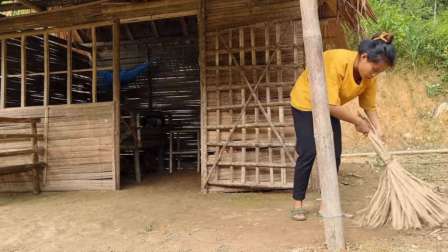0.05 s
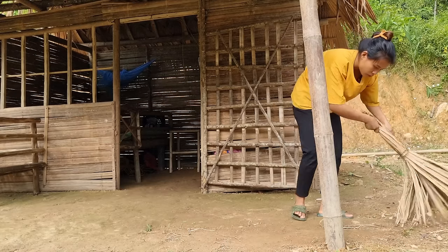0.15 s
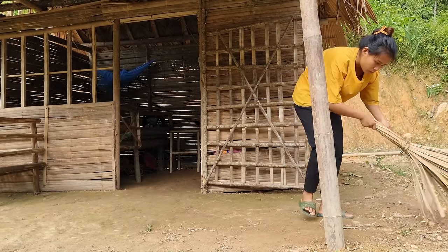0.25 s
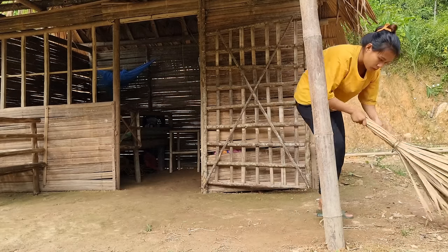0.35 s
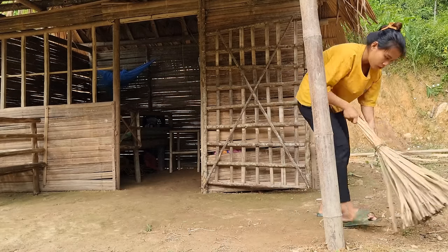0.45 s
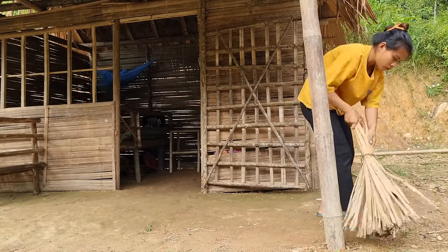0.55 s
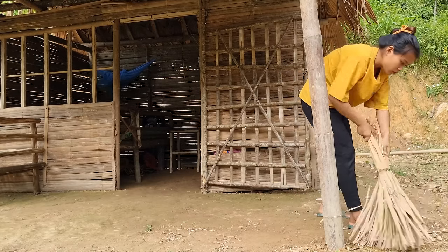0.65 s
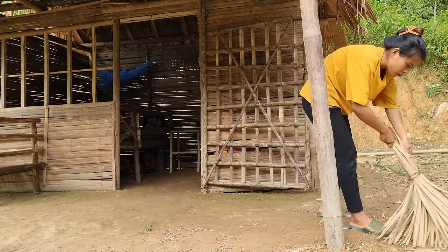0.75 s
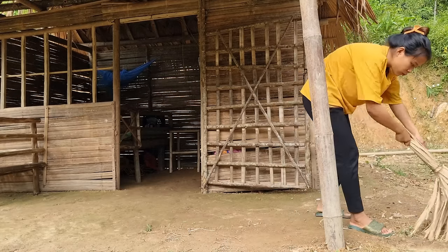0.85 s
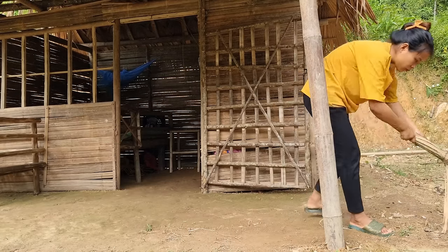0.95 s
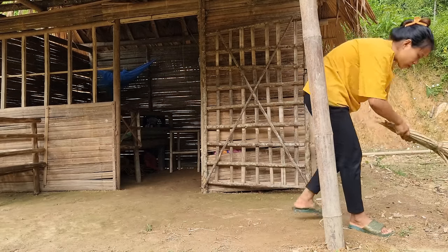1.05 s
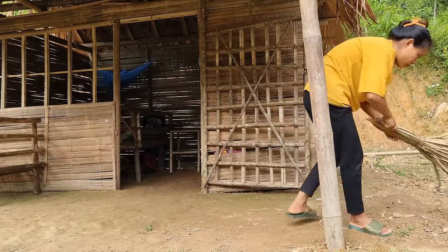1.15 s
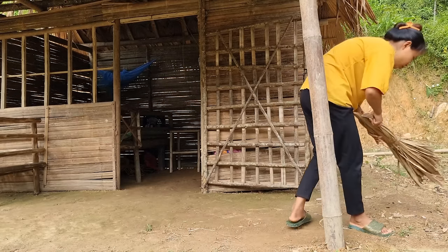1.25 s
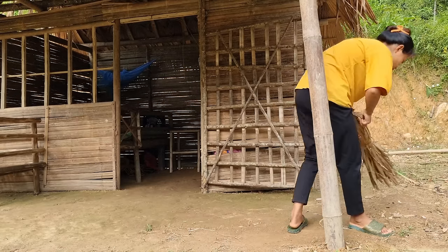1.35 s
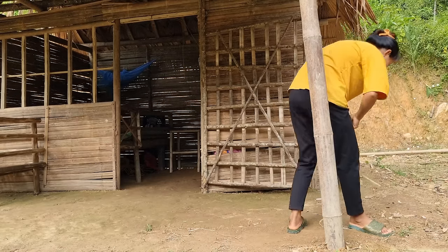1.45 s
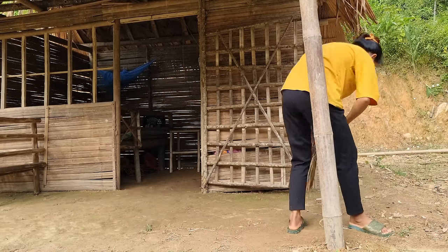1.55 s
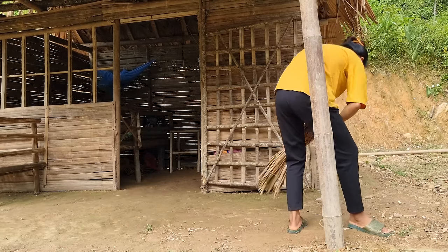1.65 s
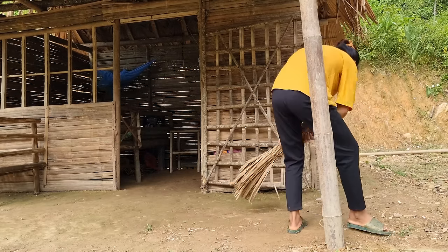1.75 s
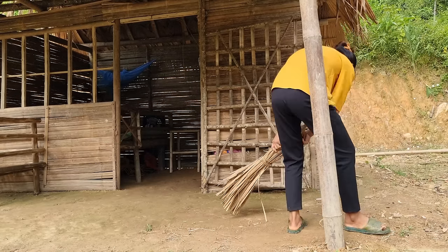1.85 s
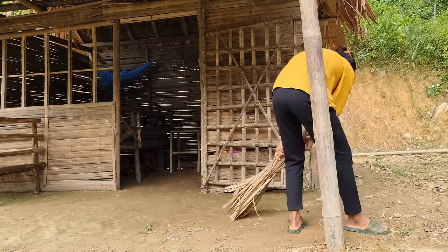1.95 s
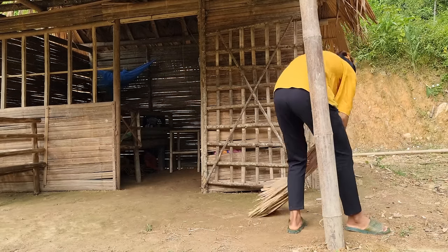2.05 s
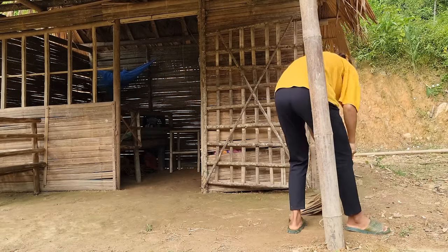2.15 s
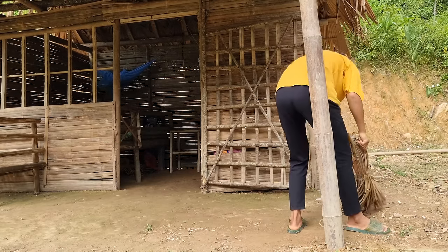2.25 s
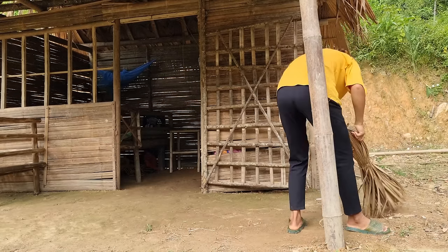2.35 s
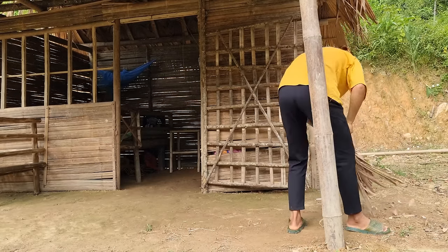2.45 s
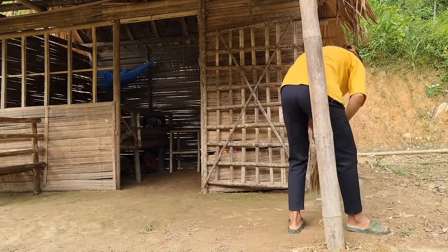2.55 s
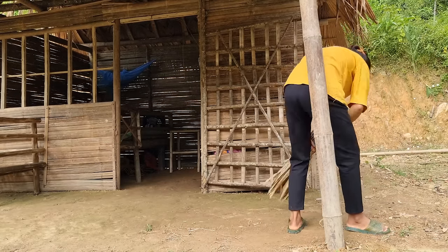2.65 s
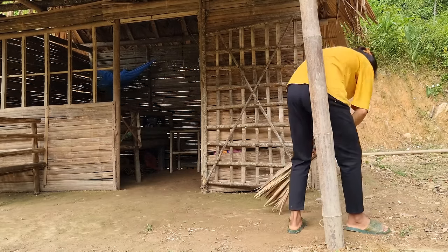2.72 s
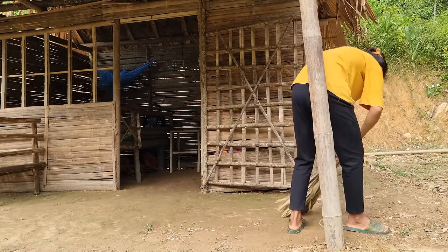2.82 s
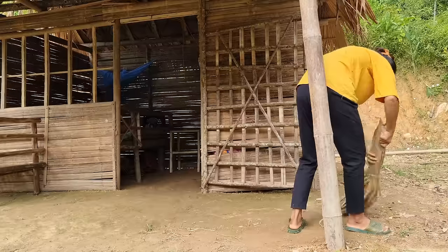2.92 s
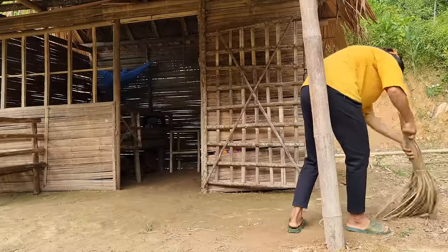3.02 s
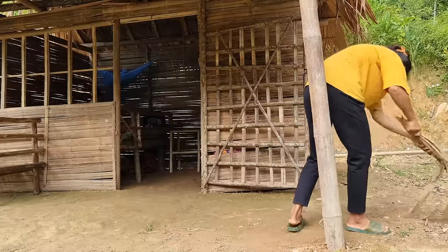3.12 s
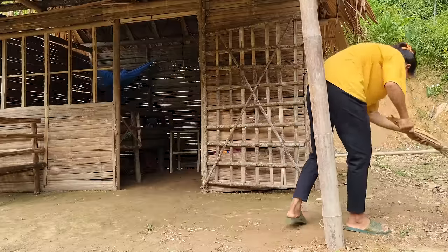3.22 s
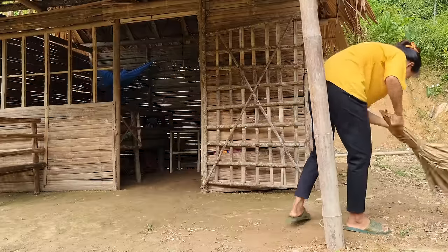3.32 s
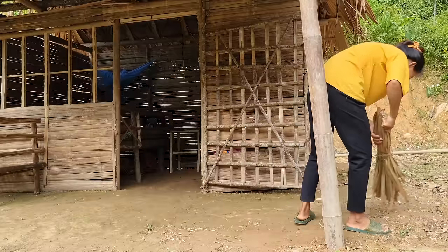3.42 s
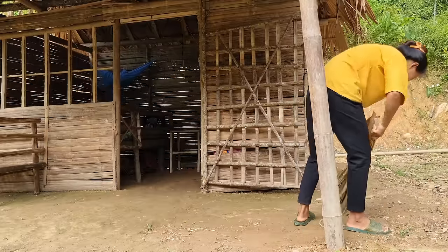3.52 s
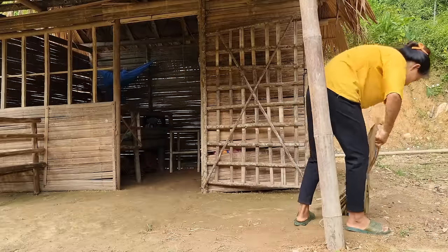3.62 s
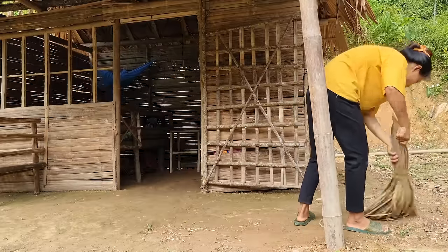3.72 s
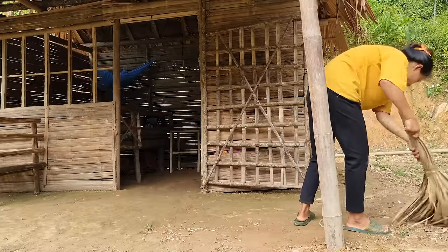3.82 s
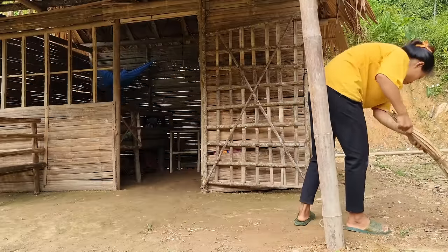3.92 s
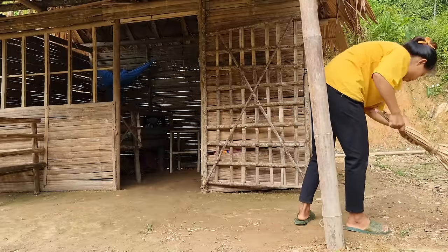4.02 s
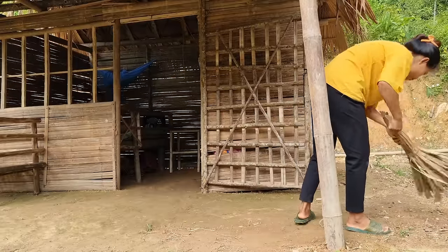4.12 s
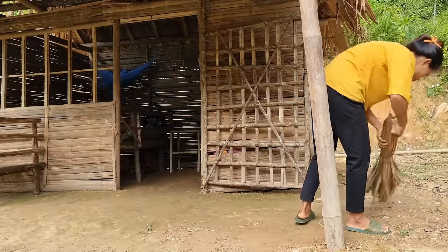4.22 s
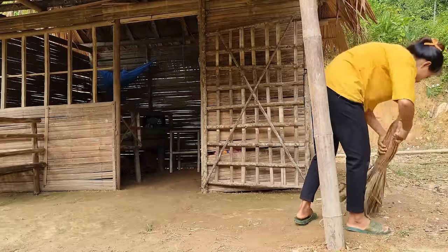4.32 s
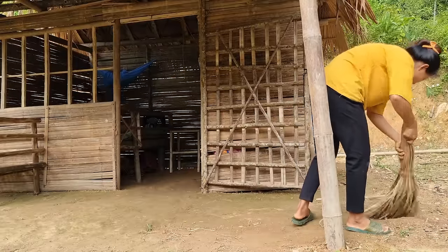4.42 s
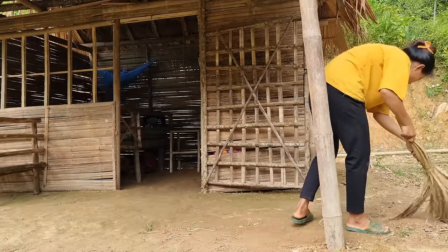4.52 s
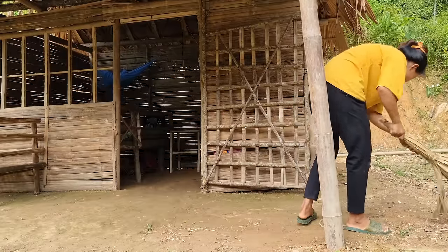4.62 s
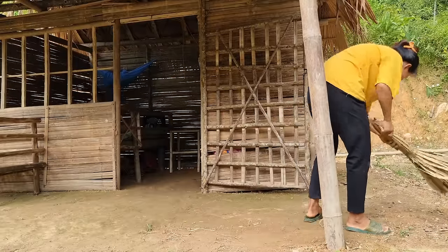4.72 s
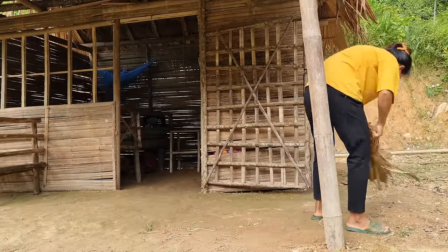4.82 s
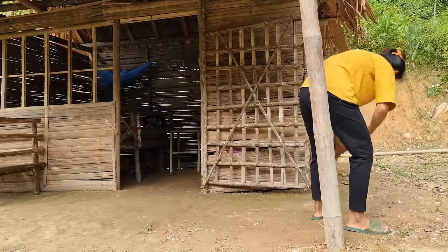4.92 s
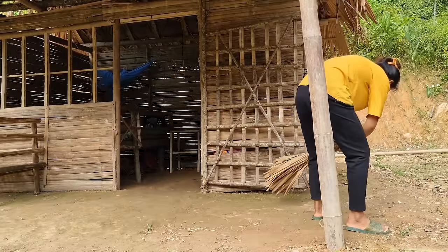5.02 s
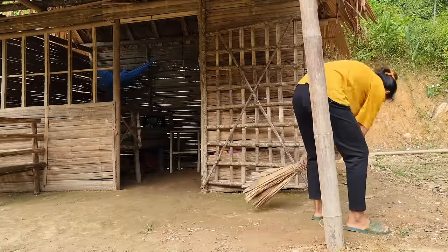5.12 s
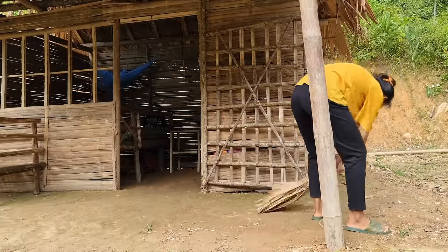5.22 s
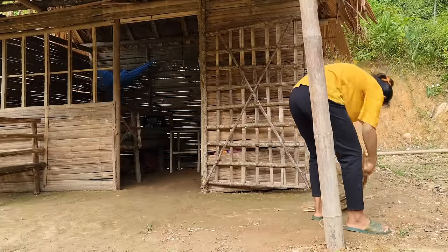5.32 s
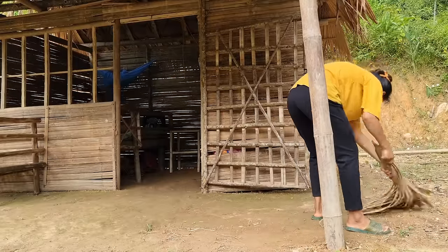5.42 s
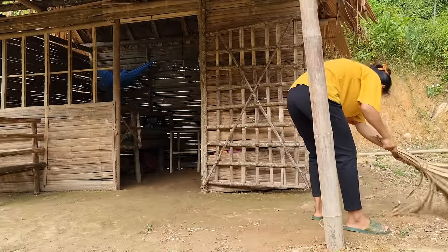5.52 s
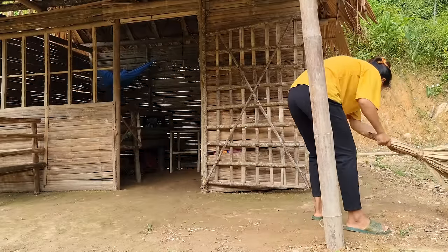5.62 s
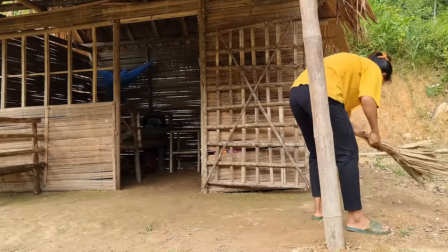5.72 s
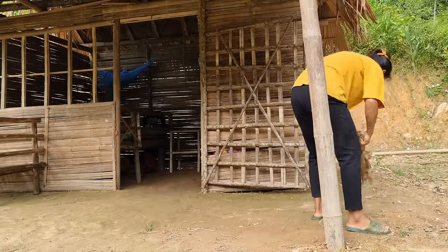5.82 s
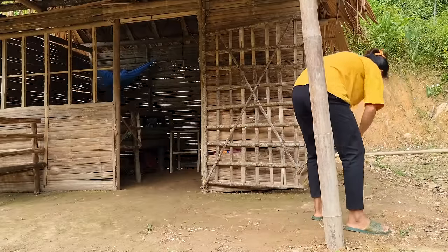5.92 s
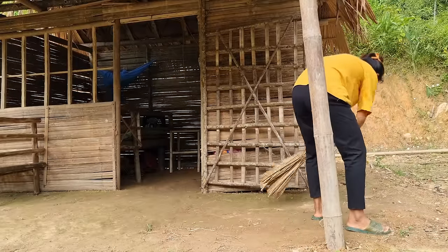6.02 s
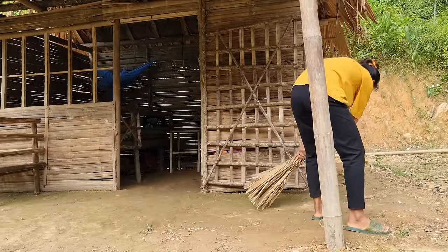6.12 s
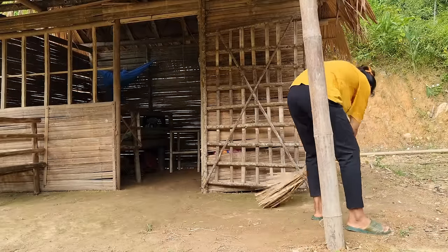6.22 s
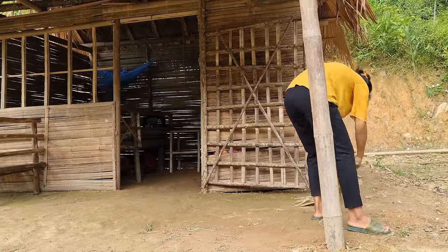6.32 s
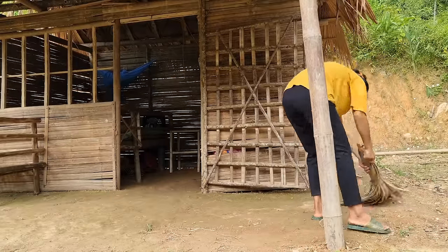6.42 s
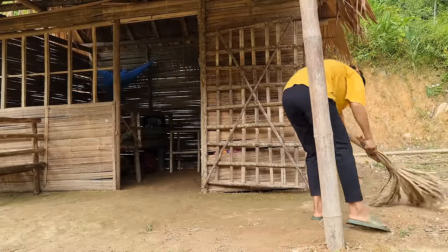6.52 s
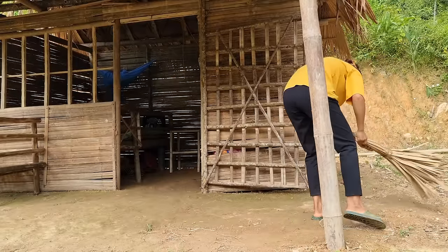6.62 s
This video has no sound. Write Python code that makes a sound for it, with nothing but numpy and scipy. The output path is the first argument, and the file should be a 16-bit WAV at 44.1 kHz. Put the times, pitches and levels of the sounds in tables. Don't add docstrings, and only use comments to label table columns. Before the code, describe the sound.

A stiff straw broom sweeps bare packed earth a few metres to the right of a phone. Eight gritty strokes come one by one, some firm and quick, others soft and slow, swinging from behind the legs outward and brightening. Stalks snap back, crumbs tick down and the bundle bumps softly. Behind it lie faint wind and thin distant insects, with a very short echo from a hut wall.

```python
import sys
import numpy as np
from scipy import signal
from scipy.fft import rfft, irfft
from scipy.io import wavfile
from scipy.ndimage import uniform_filter1d, map_coordinates

SR = 44100
rng = np.random.default_rng(int(sys.argv[2]) if len(sys.argv) > 2 else 0)


def put_to_file(sound):
    columns = np.atleast_2d(sound).T
    safe = np.clip(columns, -1, 1)
    whole_steps = np.round(safe * 32767)
    wavfile.write(sys.argv[1], SR, whole_steps.astype(np.int16))


def attenuation_scalar(level_db):
    decades = np.asarray(level_db, float) / 20
    return 10 ** decades


N = 293706


def unit(x):
    return x / np.sqrt(np.mean(x ** 2))


def band(x, lo_hz, hi_hz, order=2):
    sos = signal.butter(order, [lo_hz, min(hi_hz, .45 * SR)], "band", fs=SR, output="sos")
    return signal.sosfilt(sos, x)


def curve(table):
    start_s, *columns = np.transpose(table)
    return [np.interp(np.arange(N) / SR, start_s, column) for column in columns]


def colour(x, points, size=2048):
    freq_hz, level_db = np.transpose(points)
    grid_hz = np.arange(size // 2 + 1) * SR / size
    log_gain = np.log(attenuation_scalar(np.interp(np.log(grid_hz + 1), np.log(freq_hz), level_db)))
    cepstrum = irfft(log_gain, size)
    cepstrum[1:size // 2] *= 2
    cepstrum[size // 2 + 1:] = 0
    return signal.fftconvolve(x, irfft(np.exp(rfft(cepstrum)), size))[:N]


def late(x, lag_samples):
    return map_coordinates(x, [np.arange(N) - lag_samples], order=4, mode="nearest")


def walk(rate_hz):
    k = int(SR / rate_hz)
    held = np.repeat(rng.standard_normal(N // k + 1), k)
    return 1.3 * uniform_filter1d(uniform_filter1d(held, k), k)[:N]


def slips(rate_hz, spread_db, fade_s):
    when, size = rng.random(N), np.minimum(rng.exponential(1, N), 3)
    kicks = (when < rate_hz / SR) * attenuation_scalar(spread_db * size)
    return signal.lfilter([1], [1, -np.exp(-1 / (fade_s * SR))], kicks)


def add_burst(out, start_s, noise, shape, peak_db, ring_hz, hiss_db):
    ring = band(noise * shape, ring_hz / 1.33, ring_hz * 1.6, order=1)
    hiss = band(noise * shape, 7800, 13900)
    sound = ring / np.abs(ring).max() + attenuation_scalar(hiss_db) * hiss / np.abs(hiss).max()
    start = int(start_s * SR)
    out[start:start + len(noise)] += attenuation_scalar(peak_db) * sound


# freq_hz, level_db
YARD_LEFT = [(30, -27), (150, -11), (340, 0), (600, -3.5), (1050, -2), (1500, -11), (2500, -8), (3200, -12),
             (4100, -19), (5900, -26), (7200, -30), (8200, -48), (10000, -35), (15400, -29)]
# freq_hz, level_db
YARD_RIGHT = [(30, -29), (150, -16), (340, -6), (600, -6.5), (1050, -7), (1500, -13), (2500, -16),
              (4000, -19), (5900, -25), (7500, -30), (8400, -48), (9300, -28), (11500, -31), (15400, -24)]


def yard():
    level_db, shared_power, lead_samples = -61, 0.65, 23.3
    shared, own = rng.standard_normal(N), rng.standard_normal((2, N))
    shared, own = np.sqrt(shared_power) * shared, np.sqrt(1 - shared_power) * own
    left = colour(shared + own[0], YARD_LEFT)
    right = colour(late(shared, lead_samples) + own[1], YARD_RIGHT)
    swell_db = .5 * walk(2) + .7 * walk(15)
    return np.array([left, right]) / left.std() * attenuation_scalar(level_db + swell_db)


# centre_hz, width_hz, left_db, right_db
INSECTS = [(4950, 750, -68, -66.5), (6800, 800, -77, -71.5)]


def insects():
    out = np.zeros((2, N))
    for centre_hz, width_hz, left_db, right_db in INSECTS:
        lo_hz, hi_hz = centre_hz - width_hz / 2, centre_hz + width_hz / 2
        near, far = (unit(band(rng.standard_normal(N), lo_hz, hi_hz, order=3)) for _ in range(2))
        near = near * attenuation_scalar(2.9 * walk(40) + 0.47 * walk(1))
        left = .7 * late(near, 5.) + .7 * far
        out += np.array([attenuation_scalar(left_db) * left, attenuation_scalar(right_db) * near])
    return out


# touch_s, clear_of_legs_s, lift_s, touch_lag_samples
SWINGS = [
    (0.0, 0.1, 0.46, 6.8),
    (0.68, 0.76, 1.16, 6.4),
    (2.05, 2.36, 2.46, 0.5),
    (2.88, 3.07, 3.31, 2.8),
    (3.68, 3.82, 4.11, 6),
    (4.4, 4.46, 4.776, 8.2),
    (5.28, 5.51, 5.8, 1.5),
    (6.28, 6.53, 6.74, 1.1),
]


def swing():
    clear_lag, lift_lag, hang_s = 6.82, 11.1, 0.14
    hidden_time, hidden_way = 0.73, 0.4
    points = []
    for touch_s, clear_s, lift_s, lag in SWINGS:
        hidden_s = touch_s + hidden_time * (clear_s - touch_s)
        points += [(touch_s, lag), (hidden_s, lag + hidden_way * (clear_lag - lag)),
                   (clear_s, clear_lag), (lift_s, lift_lag), (lift_s + hang_s, lift_lag)]
    return curve(points)[0]


# start_s, scrape_db
PRESSURE = [
    [(0.02, -58), (0.046, -43), (0.186, -38.5), (0.31, -42), (0.36, -46.5), (0.46, -53.5), (0.58, -69)],
    [(0.74, -51.5), (0.788, -39), (0.96, -40.5), (1.108, -45), (1.14, -56), (1.23, -58.5), (1.42, -72)],
    [(1.94, -83), (2.03, -61.5), (2.14, -48.5), (2.2, -43.5), (2.426, -45.5), (2.49, -52), (2.74, -67)],
    [(2.8, -61.5), (2.89, -62), (2.92, -47), (3.044, -44), (3.082, -37), (3.274, -45), (3.56, -68)],
    [(3.7, -51.5), (3.846, -37.5), (4.062, -40.5), (4.11, -46.5), (4.156, -54.5), (4.27, -64.5),
     (4.326, -59)],
    [(4.385, -70), (4.474, -46), (4.608, -37.5), (4.822, -54), (4.894, -65.5), (5.05, -66.5), (5.14, -73)],
    [(5.25, -68.5), (5.345, -45), (5.42, -41), (5.57, -37.5), (5.86, -58), (6.0, -68.5), (6.2, -70.5)],
    [(6.3, -60), (6.376, -46), (6.486, -45), (6.538, -39), (6.646, -43), (6.66, -40.5)],
]
# lag_samples, rustle_db, hiss_db, rumble_db over scrape
REACH = [(3, -4, -9.5, -23), (8, 1, -4.5, -18.5), (12, 3, -3.5, -13.5)]


def bearing(lag):
    lag_samples, *shares_db = np.transpose(REACH)
    return curve(np.vstack(PRESSURE)) + [np.interp(lag, lag_samples, db) for db in shares_db]


def plucks():
    stalks_hz, rate_hz = [900, 1300, 1900, 2700, 3800, 5000, 6400, 9500, 12500], 90
    out = 0
    for hz in stalks_hz * attenuation_scalar(rng.uniform(-1, 1, len(stalks_hz))):
        ring = band(slips(rate_hz, 4, 1e-5), hz * .96, hz * 1.04, order=1)
        out = out + np.sqrt(hz) * unit(ring)
    return unit(out)


def tuft(scrape_db, rustle_db, hiss_db, rumble_db, catching):
    lifted_db = np.maximum(-62.5 - scrape_db, 0)
    hiss_db = hiss_db - 0.54 * lifted_db
    rumble_db = rumble_db + .6 * lifted_db
    grit, flicks = rng.standard_normal(N), attenuation_scalar(-6) * plucks()
    ticks = unit(slips(400, 2.5, .0002))
    scrape = unit(band(grit * (1 + 0.43 * catching + 0.19 * ticks) + flicks, 346, 3544))
    rustle = unit(band(grit * (1.05 + 0.42 * catching + 0.14 * ticks) + 1.36 * flicks, 2534, 8300))
    hiss = unit(band(grit * (1 + 0.34 * catching + .5 * ticks) + flicks, 11550, 15830))
    rumble = unit(band(grit * (1 + 0.13 * catching), 110, 577, order=3))
    mix = scrape + attenuation_scalar(rustle_db - 4.0) * rustle
    mix = mix + attenuation_scalar(hiss_db + 5.0) * hiss + attenuation_scalar(rumble_db + 2.5) * rumble
    return attenuation_scalar(scrape_db) * mix


# start_s, peak_db, ring_hz, t60_s
SNAPS = [(0.026, -35, 2900, 0.03), (0.3164, -16.5, 3900, 0.075), (0.3848, -23, 4000, 0.026),
         (0.4085, -18.5, 3050, 0.054), (0.6953, -28.5, 5100, 0.04), (0.7634, -21, 3530, 0.02),
         (1.0314, -24, 3950, 0.033), (1.0979, -22, 3290, 0.05), (1.1744, -32, 2800, 0.04),
         (1.2186, -29.5, 3640, 0.053), (1.955, -43.5, 2640, 0.055), (2.0951, -29.5, 2310, 0.2),
         (2.1844, -30, 1980, 0.067), (2.6632, -42, 2570, 0.066), (2.853, -38, 1960, 0.034),
         (2.9252, -32, 1490, 0.033), (3.0769, -26, 3760, 0.043), (3.3076, -29.5, 3330, 0.019),
         (3.3788, -26.5, 3600, 0.053), (3.6406, -33.5, 4030, 0.03), (3.704, -28, 1550, 0.033),
         (4.0924, -21, 3540, 0.05), (4.1729, -27.5, 3400, 0.087), (4.3146, -35, 4000, 0.11),
         (4.7955, -26.5, 3860, 0.093), (4.9153, -31.5, 4200, 0.077), (5.3154, -37, 1860, 0.06),
         (5.3462, -27.5, 1580, 0.067), (5.7771, -24, 3870, 0.043), (5.8461, -30, 3780, 0.025)]


def snaps():
    out, t = np.zeros(N + 3000), np.arange(3000) / SR
    for start_s, peak_db, ring_hz, t60_s in SNAPS:
        shape = (1 - np.exp(-t / 0.0027)) * np.exp(-np.log(1000) * t / max(t60_s, .002))
        add_burst(out, start_s, rng.standard_normal(3000), shape, peak_db - 11.5, ring_hz, hiss_db=-3.5)
    return out[:N]


# start_s, peak_db, pitch_hz
BUMPS = [(0.05, -44.5, 203), (0.768, -54, 232), (1.093, -44, 132), (3.64, -48, 180), (4.017, -34, 181),
         (4.615, -44, 180), (5.19, -52, 236), (6.519, -37, 182), (3.8, -50, 115), (4.04, -48, 110),
         (5.7, -48, 105)]


def bumps():
    out, t = np.zeros(N + 8192), np.arange(8192) / SR
    for start_s, peak_db, pitch_hz in BUMPS:
        shape = t / 0.018 * np.exp(1 - t / 0.0068)
        start = int(start_s * SR)
        out[start:start + 8192] += attenuation_scalar(peak_db) * shape * np.sin(2 * np.pi * pitch_hz * t)
    return out[:N]


# start_s, peak_db, ring_hz, hiss_db over the ring
CRUMBS = [(0.452, -42, 3880, -1), (0.482, -47, 2920, 3), (0.5318, -40, 2760, -7), (0.6753, -37, 4120, -14),
          (0.7372, -31, 3720, -9), (1.207, -32, 3640, -9), (1.2485, -50, 2990, 2), (1.3436, -42.5, 3760, 2),
          (1.5994, -54, 5120, -6), (2.036, -40.5, 1900, -8), (2.478, -26, 4080, -9), (2.5784, -45, 4000, 0),
          (3.261, -30, 3870, -1), (3.4533, -35, 3200, -10), (3.4854, -39, 2440, -6),
          (3.5274, -39, 3730, -7), (3.79, -32, 3700, 8), (4.0254, -26, 3090, 2), (4.2074, -34, 4060, -5),
          (4.357, -38, 3990, -10), (4.4132, -35.5, 3700, -10), (4.9129, -31, 4440, -3),
          (4.9586, -41, 3670, 7), (5.1877, -52, 2920, 3), (5.277, -38.5, 1800, -6), (5.8303, -31, 4080, -5),
          (5.877, -36, 3810, -2), (6.0114, -40.5, 3660, -12), (6.018, -38.5, 2470, -12),
          (6.325, -36.5, 1960, -14)]


def crumbs():
    out, t = np.zeros(N + 3000), np.arange(600) / SR
    shape = np.exp(-t / .0006) + .1 * np.exp(-t / .004)
    for start_s, peak_db, ring_hz, hiss_db in CRUMBS:
        add_burst(out, start_s, rng.standard_normal(600), shape, peak_db - 5.0, ring_hz, hiss_db)
    return out[:N]


def wall_echo(tufts, hits):
    t60_s, level_db = .04, -17
    t = np.arange(int(.1 * SR)) / SR
    decay = np.exp(-np.log(1000) * t / t60_s) * (t > .002)
    tails = rng.standard_normal((2, len(tufts), len(t))) * decay
    tails *= attenuation_scalar(level_db) / np.sqrt(np.sum(tails ** 2, axis=2, keepdims=True))
    return [sum(signal.fftconvolve(x + hits / len(tufts), tail)[:N] for x, tail in zip(tufts, port))
            for port in tails]


def detour(x):
    hz = np.arange(N // 2 + 1) * SR / N
    lag_samples = 10.64 / (1 + (hz / 970) ** 2)
    return irfft(rfft(x) * np.exp(-2j * np.pi * hz / SR * lag_samples), N)


# freq_hz, level_db
LEFT_PORT = [(40, 6.5), (150, -3.5), (330, 5.5), (520, 0.5), (1200, 8.5), (2000, 8.5), (3200, 9), (4500, 4),
             (6200, -0.5), (7600, -21), (9000, -10), (11000, -9), (15400, -8.5)]
# freq_hz, level_db
RIGHT_PORT = [(40, 12.5), (150, -7.5), (320, 3), (500, 2.5), (1100, 10.5), (1900, 10), (2800, 8.5),
              (4200, 9.5), (6000, 5.5), (8000, -1.5), (9500, 6), (12000, -0.5), (15400, 0.5)]


def broom(count=3):
    lag = swing()
    layers_db = bearing(lag)
    catching = uniform_filter1d(unit(slips(90, 4.7, 0.014)), size=60) * attenuation_scalar(4.3 * walk(25))
    tufts = [tuft(*layers_db, catching) / np.sqrt(count) for _ in range(count)]
    body = attenuation_scalar(0.35 * (lag - 8.5)) - 1
    tufts = [x + body * band(x, 410, 1600, order=1) for x in tufts]
    hits = snaps() + bumps() + crumbs()
    right = sum(tufts) + hits

    loose_db, firm_db, contact_hz, spread_samples = -56, -49.5, 2930, 3.28
    firm = np.clip((layers_db[0] - loose_db) / (firm_db - loose_db), 0, 1)
    patch = [firm * band(x, 20, contact_hz, order=1) for x in tufts]
    left = late(hits + sum(patch), lag)
    offsets = np.arange(count) - (count - 1) / 2
    for x, pressed, offset in zip(tufts, patch, offsets):
        left = left + late(x - pressed, lag + spread_samples * offset + 0.72 * walk(20))
    left = left + (attenuation_scalar(-0.44 * (lag - 20)) - 1) * band(left, 5200, 13000, order=1)
    left = detour(left)
    wall = wall_echo(tufts, hits)
    return np.array([colour(left + wall[0], LEFT_PORT), colour(right + wall[1], RIGHT_PORT)])


def scene():
    return broom() + yard() + insects()


def roll_off(x):
    return signal.sosfilt(signal.butter(12, 15650, fs=SR, output="sos"), x)


def record(dry):
    cut = signal.sosfilt(signal.ellip(8, .2, 60, 15750, fs=SR, output="sos"), dry)
    return roll_off(cut)


dry = scene()
out = record(dry)
put_to_file(out)
```